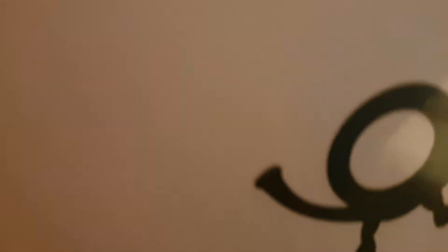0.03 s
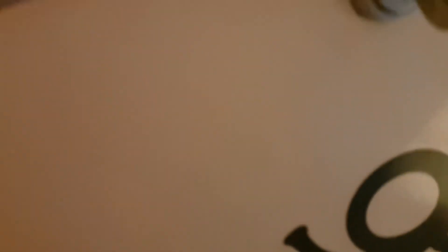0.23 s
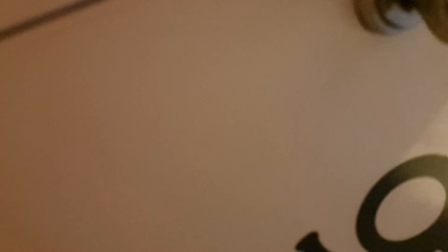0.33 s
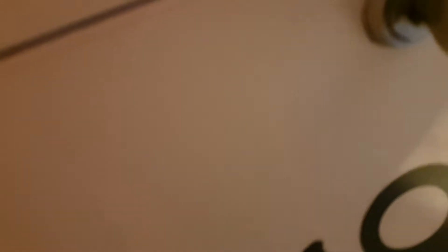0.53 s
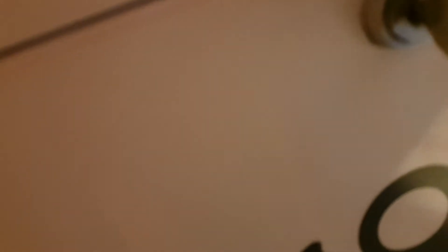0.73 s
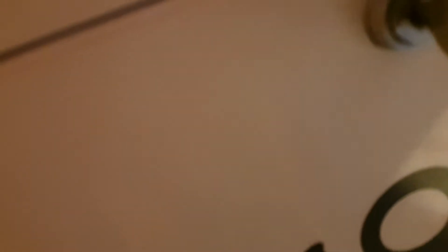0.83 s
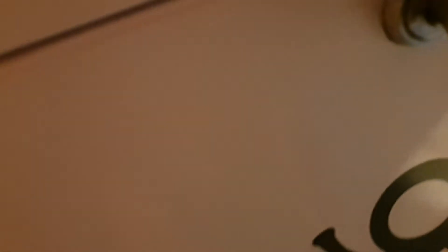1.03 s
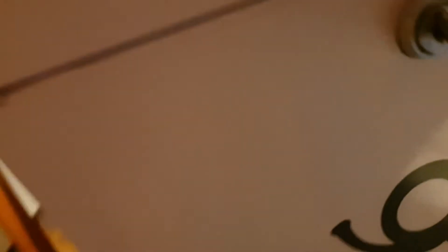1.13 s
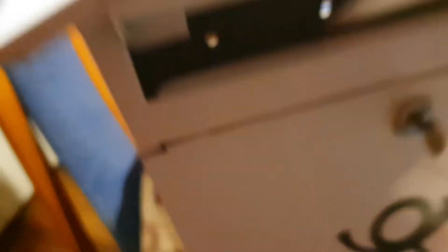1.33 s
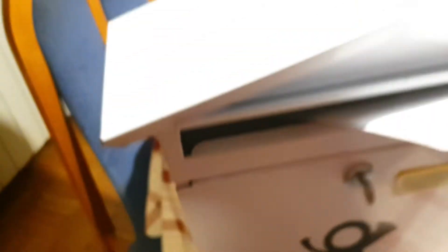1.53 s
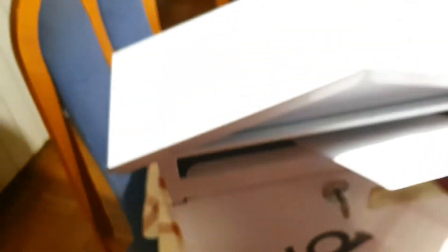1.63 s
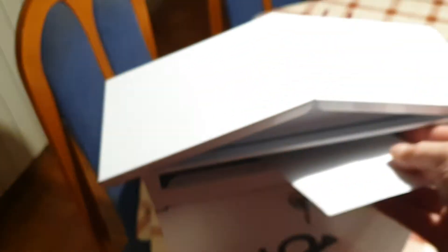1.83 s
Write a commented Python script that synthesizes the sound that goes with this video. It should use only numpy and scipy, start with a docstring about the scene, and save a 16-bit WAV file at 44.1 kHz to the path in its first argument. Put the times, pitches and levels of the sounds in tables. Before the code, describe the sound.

A thin metal mailbox is handled close to the microphone in a small room: a latch ticks and squeaks, the lid clacks with a hollow ring, a knock follows, then it scrapes open to a stop and paper crackles faintly.

```python
"""In a small room, a sheet-metal mailbox is handled close to the listener.
The latch ticks, the lid clacks and the box rings on; the lid is knocked, scrapes open and clacks
against its stop. Paper slides and crackles softly. Hits are short noise shaped octave by octave,
ringing is a set of dying sine waves, and rubbing is grainy noise with tiny slips.
Echoes of the room, a rumble of handling and a quiet hiss lie around it all."""
import sys
import numpy as np
from scipy import signal
from scipy.fft import rfft, irfft
from scipy.io import wavfile
from scipy.ndimage import uniform_filter1d

SR = 44100
rng = np.random.default_rng(int(sys.argv[2]) if len(sys.argv) > 2 else 0)


def generate_wav(sig):
    """Save sig (samples, or channels by samples) to the path in sys.argv[1] as 16-bit PCM at SR."""
    pcm = np.round(np.clip(np.atleast_2d(sig).T, -1, 1) * 32767).astype(np.int16)
    wavfile.write(sys.argv[1], SR, pcm)


N = 83790
TIME, FREQ = np.arange(N) / SR, np.fft.rfftfreq(N, 1 / SR)
# In every table, left_right_db is how much louder the left side is than the right.


def amp(db):
    """Turns decibels into a factor for the wave."""
    return 10 ** (np.asarray(db) / 20)


def evened(x):
    """Scales a sound to an average strength (rms) of 1."""
    return x / np.sqrt(np.mean(x ** 2, axis=-1, keepdims=True) + 1e-20)


def read(points, hz):
    """Reads between the points of a table, with pitch spaced evenly by octave."""
    point_hz, value = np.transpose(points)
    return np.interp(np.log(hz + 1), np.log(point_hz), value)


def sides(pan_db):
    """Left and right factors that keep the total power the same."""
    return evened(amp(np.array([pan_db, -pan_db]) / 2))[:, None]


def dying(t, t60):
    """A vibration losing energy steadily: it falls 60 dB in t60 seconds."""
    return np.exp(-np.log(1000) * t / max(t60, 1e-3))


def add(mix, start_s, sound):
    """Mixes a sound in at its start time, cutting off what runs past the end."""
    part = mix[:, max(round(start_s * SR), 0):][:, :sound.shape[-1]]
    part += sound[..., :part.shape[1]]


def noise(size):
    """Spectra of stereo noise: long bass waves reach both sides almost alike, treble does not."""
    # how alike left and right are: pitch_hz, likeness [0 to 1]
    likeness = [(62, .75), (130, .97), (330, 0.94), (620, 0.4), (2000, 0.094), (16000, .05)]
    hz = np.fft.rfftfreq(size, 1 / SR)
    left, other = rfft(rng.standard_normal((2, size)))
    same = np.clip(read(likeness, hz), 0, 1)
    right = same * left + np.sqrt(1 - same ** 2) * other
    return hz, np.array([left, right])


def octave_noise(size):
    """Stereo noise split into overlapping bands, one octave apart."""
    hz, spectra = noise(size)
    bands = []
    for centre_hz in 62.5 * 2.0 ** np.arange(9):
        weight = np.maximum(1 - abs(np.log2((hz + 1) / centre_hz)), 0)
        bands.append((centre_hz, irfft(spectra * weight, size)))
    return bands


def hiss(spectrum):
    """Steady stereo noise whose energy is spread over pitch as the table says."""
    return evened(irfft(noise(N)[1] * amp(read(spectrum, FREQ)), N))


def contact(colour, level_db, body_db, top_db, ring_s, pan_db, rise_s=0):
    """A hit as dense, quickly dying vibration: high bands start faster than low ones."""
    # how long each band rings: pitch_hz, share of ring_s
    ring_share = [(62, 1.5), (250, 2.14), (1000, 1.346), (4000, 0.89), (16000, .8)]
    # extra difference between the sides: pitch_hz, left_right_db
    shadow = [(62, -2), (500, -4.5), (5000, -3), (9000, 6.5), (16000, 5.5)]
    crack_share, crack_s = 0.4, 0.0006  # extra push at the instant of contact
    rise_cycles = 1.0  # each band needs about this many of its own cycles to build up
    bands = octave_noise(size=8192)
    t = TIME[:bands[0][1].shape[1]]
    crack = 1 + crack_share * np.exp(-t / crack_s)
    tilt = [(600, body_db), (4500, 0.0032), (6500, 0), (11000, top_db)]  # pitch_hz, level_db
    out = 0
    for hz, band in bands:
        rise = 1 - np.exp(-t / (abs(rise_s) + rise_cycles / hz))
        env = rise * dying(t, ring_s * read(ring_share, hz)) * crack
        gain = amp(level_db + read(colour, hz) + read(tilt, hz)) * sides(pan_db + read(shadow, hz))
        # the band's random strength is evened out, then the envelope's own strength is put back
        out = out + gain * evened(band * env) * np.sqrt(np.mean(env ** 2))
    return out


def mode(hz, rise_s, t60):
    """One natural vibration: a sine wave that swells and dies away."""
    swell = 1 - np.exp(-TIME / max(rise_s, 1e-4))
    return np.sin(2 * np.pi * hz * TIME) * swell * dying(TIME, t60)


def rubbing(strokes, spectrum, grit_db):
    """Friction: noise with a jittery level, plus bursts as the surfaces stick and slip."""
    grain_db = 2.5  # typical jitter of the level
    slips_per_s, slip_spread_db = 610, 4.5
    slip_decay_s, release_s = 0.0016, 0.023
    out = np.zeros((2, N))
    for start_s, length_s, level_db, change_db, rise_s, pan_db in strokes:
        jitter = evened(uniform_filter1d(rng.standard_normal(N), size=40))
        grain = evened(amp(grain_db * jitter))

        slip_db = slip_spread_db * np.minimum(rng.exponential(1, N), 3)
        slips = (rng.random(N) < slips_per_s / SR) * amp(slip_db)
        bursts = signal.lfilter([1], [1, -np.exp(-1 / (slip_decay_s * SR))], slips)
        grain = grain + amp(grit_db) * evened(bursts)

        rise = np.clip(TIME / rise_s, 0, 1)
        release = np.clip((length_s - TIME) / release_s + 0.5, 0, 1)
        gain = amp(level_db + change_db * np.minimum(TIME / length_s, 1))
        stroke = evened(hiss(spectrum) * grain) * rise * release * gain
        add(out, start_s, stroke * sides(pan_db))
    return out


def quiet_floor():
    """A faint, steady hiss: random noise of a fixed colour."""
    # colour of the hiss: pitch_hz, level_db [per Hz]
    floor_colour = [(25, -3.5), (60, 0.5), (310, -14), (1350, -18.5), (2200, -17.5), (6700, -16.5),
                    (8500, -22), (14800, -19.5), (16000, -23.5)]
    return hiss(floor_colour) * amp(-76.5) * sides(pan_db=3)


def handling_rumble():
    """Low noise from the handling, whose level rises and falls."""
    # colour of the rumble: pitch_hz, level_db [per Hz]
    rumble_colour = [(28, -24.5), (42, -6), (54, 3.5), (85, -12), (160, -2.5), (270, -3), (450, -23.5),
                     (1200, -27), (4000, -58.5)]
    # strength of the rumble over time: time_s, level_db
    handling = [(0, -49.5), (.17, -61), (.5, -57), (.68, -65.5), (.8, -62.5), (1.15, -46), (1.35, -74),
                (1.5, -84), (1.7, -96), (1.9, -72.5)]
    level_db = np.interp(TIME, *np.transpose(handling))
    return hiss(rumble_colour) * amp(level_db) * sides(pan_db=6.5)


def room(near):
    """A small room's blurred echoes: each band of noise swells, then dies at its own pace."""
    # how long the echoes last: pitch_hz, t60_s
    echo_t60 = [(62, 1), (250, 0.42), (1000, 0.4), (4000, 0.44), (8000, 0.55), (16000, .33)]
    # how strong the echoes are: pitch_hz, level_db
    echo_level = [(62, -7.5), (170, -1.5), (320, -10), (1000, -12), (4000, -17.5), (8000, -23.5),
                  (16000, -25.5)]
    t, tail = TIME[:SR], 0
    for hz, band in octave_noise(size=SR):
        swell = 1 - np.exp(-(t / 0.0097) ** 2)
        env = swell * dying(t, read(echo_t60, hz))
        tail = tail + band * env / np.linalg.norm(env) * amp(read(echo_level, hz))
    sent = 0.78 * near[:1] + 0.16 * near[1:]
    return signal.fftconvolve(sent, tail, axes=1)[:, :N] * sides(pan_db=4)


def paper():
    """Paper rubs as it slides, and snaps with short, dying hits as it crackles."""
    # sliding strokes: start_s, length_s, level_db, change_db [by the end], rise_s, left_right_db
    slides = [(0, 0.082, -60, 2, 0.0017, 4.5), (.068, 0.07, -45, -1, 0.02, 24),
              (.445, 0.076, -58.5, 3.5, 0.046, 7), (.566, 0.049, -52, -9, 0.012, 2),
              (1.425, .055, -59, 3, 0.019, 14), (1.55, 0.071, -64.5, -6, 0.011, 13),
              (1.785, 0.033, -71, -4.5, 0.0051, 14), (1.828, 0.085, -56.5, -5.5, .02, 7)]
    # colour of the sliding: pitch_hz, level_db [per Hz]
    slide_colour = [(100, -11.5), (1000, -16), (3000, -9.5), (4300, -2), (5300, 3.5), (6800, 2.5),
                    (8600, -12), (12500, -4.5), (17000, -14)]
    # snaps: start_s, level_db, body_db, top_db, ring_s [t60 before the share by pitch], left_right_db
    snaps = [(0.1436, -45.5, -11, -9.5, .03, 5.5), (.5595, -56, -10, -14, 0.019, 18),
             (.582, -48, -15, -19, 0.035, 3), (1.4139, -44, -16, 8, 0.021, 6),
             (1.496, -58.5, -7, -18, 0.021, 17), (1.546, -63, -2, -13, 0.034, 23),
             (1.561, -52, -21.5, -6, 0.023, 13.5), (1.594, -54, -9, -15, 0.019, 14),
             (1.776, -58.5, -9, -17, .018, 28.5), (1.793, -55, -28, 0, 0.015, 18.5),
             (1.827, -49, -58.5, 4.5, 0.025, 16), (1.8422, -50.5, -32, 3, 0.051, 10),
             (1.855, -46.5, -26.5, 10.5, 0.037, 11), (1.8699, -54.5, -3.5, -8, 0.027, 19.5)]
    # colour of the snaps: pitch_hz, level_db [per octave band]
    paper_colour = [(62, -3), (125, 1.5), (250, -2.5), (500, -6.5), (1000, -4.5), (2000, -11), (4000, -2.5),
                    (8000, 2), (16000, -7)]
    out = rubbing(slides, slide_colour, grit_db=-7)
    for start_s, *snap in snaps:
        add(out, start_s, contact(paper_colour, *snap))
    return out


def lid_scrapes():
    """The lid scrapes open: metal rubs on metal in gritty strokes."""
    # scraping strokes: start_s, length_s, level_db, change_db [by the end], rise_s, left_right_db
    scrapes = [(.752, 0.056, -44.5, 8.5, 0.014, 3), (.8, 0.058, -41, 4, .004, 4.5),
               (.85, 0.12, -47.5, 6, .005, 7.5), (.975, 0.101, -44, -0.5, 0.011, 1.5)]
    # colour of the scraping: pitch_hz, level_db [per Hz]
    scrape_colour = [(100, -29), (500, 0.5), (1500, -6.5), (2500, -4.5), (3800, 2), (6800, 2), (9000, -5),
                     (12000, -0.5), (14800, -2), (17000, 0)]
    return rubbing(scrapes, scrape_colour, grit_db=-5.5)


def latch_squeak():
    """The latch catches with a short squeak: one dying tone over dying noise."""
    # colour of the noise: pitch_hz, level_db [per Hz]
    squeak_colour = [(200, -26), (1200, -18.5), (1850, -1.5), (2500, 0), (2900, -8.5), (4000, -12),
                     (5300, -4.5), (8000, -18), (16000, -31)]
    start_s, t60 = 0.1305, 0.018
    tone = amp(-22.5) * sides(pan_db=16) * mode(2240, 0.0007, t60)
    rough = amp(-27) * sides(pan_db=7) * hiss(squeak_colour)
    rough = rough * np.minimum(TIME / 0.00076, 1) * dying(TIME, t60)
    out = np.zeros((2, N))
    add(out, start_s, tone + rough)
    return out


def uneven():
    """A slow random flutter of level around 1 makes each panel's ringing die away unevenly."""
    depth, flutter_hz = 0.35, 28
    slow = rfft(rng.standard_normal(N)) * np.exp(-(FREQ / flutter_hz) ** 2)
    return 1 + depth * evened(irfft(slow, N))


def box():
    """Panels ring at their own pitches; the walls flex and the body gives several low thumps and thuds."""
    # panel vibrations: pitch_hz, level_db [relative], t60_s
    panels = [(161.6, -17, 0.71), (235.3, -5, 0.38), (276.8, 1.5, 0.24), (463.4, 3, 0.18),
              (531.2, -15.5, 0.64), (543, -1.5, 0.12), (602.2, 5.5, 0.17), (894.4, -1, 0.3),
              (917.6, -2.5, 0.25), (1021, -2.5, 0.26), (1275, -6.5, 0.21), (1580, 2, 0.12),
              (1733, -5.5, 0.13), (2107, -4.5, 0.13), (3254, -4.5, 0.21)]
    # blows that set the panels ringing: start_s, level_db, soft_above_hz [higher pitches ring weaker]
    rings = [(.215, -28, 4070), (.7, -49, 690), (.922, -38.5, 910), (1.104, -34.5, 700)]
    # flexing, low thumps and thuds: start_s, pitch_hz, level_db, rise_s, t60_s, left_right_db
    flexes = [(.207, 55.55, -39, 0.0061, 1.52, 11), (.7, 270, -23, 0.00068, 0.041, 4.5),
              (1.07, 227, -19.5, 0.014, 0.14, 5), (1.104, 223, -32, 0.0079, 0.2, -12),
              (1.104, 65, -46, 0.025, 0.49, -2), (1.46, 51.85, -54.5, .01, .2, -10),
              (1.53, 271.2, -57, 0.013, 0.12, 5), (1.776, 104, -62, 0.0024, .14, 24.5)]
    out = np.zeros((2, N))
    ringing = [(hz, amp(db) * mode(hz, 0.0029, t60) * uneven()) for hz, db, t60 in panels]
    for start_s, level_db, soft_above_hz in rings:
        blow = sum(ring / np.sqrt(1 + (hz / soft_above_hz) ** 4) for hz, ring in ringing)
        add(out, start_s, amp(level_db) * sides(pan_db=9.5) * blow)
    for start_s, hz, level_db, rise_s, t60, pan_db in flexes:
        add(out, start_s, amp(level_db) * sides(pan_db) * mode(hz, rise_s, t60))
    centred_thump = amp(-22.5) * mode(60.7, rise_s=0.017, t60=0.081)
    add(out, 0.706, centred_thump)
    return out


def lid():
    """Clacks, taps and dull bumps, coloured by the pitches the metal sheet favours or swallows."""
    # In these three tables level_db comes before the sheet's colouring and the final -2 dB,
    # and ring_s is the t60 before the share by pitch.
    # lid contacts: start_s, level_db, body_db, top_db, ring_s, left_right_db
    clacks = [(0.2027, -28.5, -2, 1.5, 0.044, 25), (.2049, -21.5, -3.5, 4.5, .075, 7.5),
              (0.2103, -22, -2.5, 3.5, 0.094, 14.5), (0.2191, -25.5, -4.5, -8, 0.11, 6.5),
              (1.095, -29, 0, 3.5, 0.099, 11.5), (1.1045, -32, 9, -11, 0.051, 8),
              (1.122, -32, -7.5, 4.5, 0.054, -1)]
    # light taps of latch, hinge and key: start_s, level_db, body_db, top_db, ring_s, left_right_db
    taps = [(0.181, -42, -17, -16, 0.042, -3.5), (0.1871, -29, -19, 1.5, 0.017, 3),
            (0.1939, -33, -26, -5.5, 0.019, -5), (0.348, -48, -8, 4, 0.033, -3),
            (0.3605, -33.5, -25, -2.5, 0.033, -4.5), (0.5004, -37, -33, 1, .012, 6.5),
            (0.6987, -32.5, 0, -3.5, 0.027, 3.5), (0.7119, -37, -38, -7, 0.058, -3.5),
            (0.7514, -45.5, -12, 7, .05, 0.5), (.758, -43, -17, -3, .03, -3),
            (.7715, -36.5, -26, 3.5, .02, -2), (0.7939, -26, -9.5, -14.5, 0.011, -10),
            (.954, -31, -19, -44, 0.039, 0), (.959, -39.5, -16, -1.5, 0.046, 5),
            (1.0561, -36.5, -7.5, -2, 0.031, 6), (1.18, -37.5, -41, -5, 0.016, -1),
            (1.213, -51.5, -14, -15, .03, 0), (1.251, -50, -21, -13, 0.022, 4)]
    # dull bumps of the box: start_s, level_db, rise_s, ring_s, left_right_db
    bumps = [(0, -54.5, 0.0004, 0.12, 7), (.6997, -32.5, 0.00061, 0.023, 2.5),
             (.919, -34, 0.0013, 0.18, 9.5), (1.063, -32.5, 0.002, .12, 6),
             (1.1055, -31, 0.00057, 0.053, 16)]
    # colour of clacks and taps: pitch_hz, level_db [per octave band]
    metal_colour = [(62, -18), (125, -13), (250, -2.5), (500, 1), (1000, -1.5), (2000, 0), (4000, 2.5),
                    (8000, 1.5), (16000, 0.5)]
    # colour of the bumps: pitch_hz, level_db [per octave band]
    dull_colour = [(62, -24.5), (125, -13.5), (250, -5), (500, -5), (1000, -5), (2000, -12), (4000, -19),
                   (8000, -30), (16000, -31)]
    # resonances and hollows of the sheet: pitch_hz, width_hz, boost_db
    sheet = [(373, 110, -11), (755, 95, -6), (1138, 130, -8), (1653, 67, 2), (3600, 90, 1.5),
             (4050, 71, 2.5), (4660, 83, 4), (5040, 63, 1.5), (7076, 160, 9.5), (8440, 29, 1.5),
             (10400, 150, 6), (11230, 130, 7.5)]
    out = np.zeros((2, N))
    for start_s, *blow in clacks + taps:
        add(out, start_s, contact(metal_colour, *blow))
    for start_s, level_db, rise_s, ring_s, pan_db in bumps:
        add(out, start_s, contact(dull_colour, level_db, 0, 0, ring_s, pan_db, rise_s))
    for hz, width_hz, boost_db in sheet:
        peak = signal.lfilter(*signal.iirpeak(hz, hz / width_hz, SR), out)
        out = out + (amp(boost_db) - 1) * peak
    return out * amp(-2.0)


def scene():
    """Mailbox and paper with the room's echoes, over handling rumble and a quiet floor."""
    near = paper() + lid_scrapes() + latch_squeak() + box() + lid()
    return quiet_floor() + handling_rumble() + room(near) + near


def record(dry):
    """A band limit: a steep filter removes the treble above about 16 kHz."""
    low_pass = signal.firwin(201, 16050, window=("kaiser", 9), fs=SR)
    return signal.oaconvolve(dry, low_pass[None], "same")


dry = scene()
out = record(dry)
generate_wav(out)
```